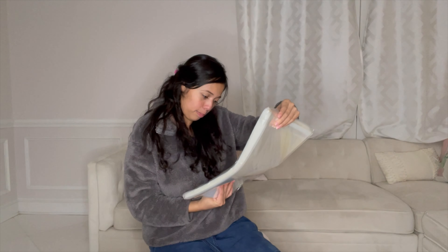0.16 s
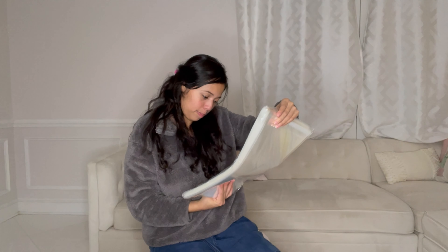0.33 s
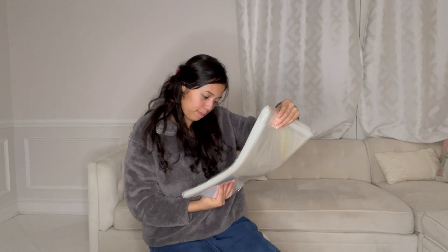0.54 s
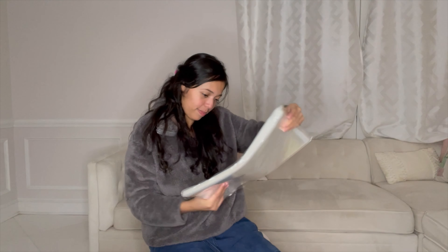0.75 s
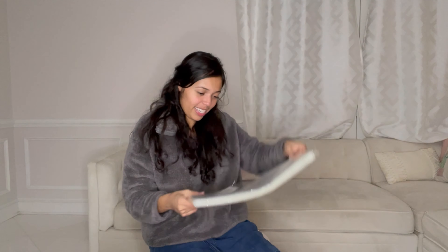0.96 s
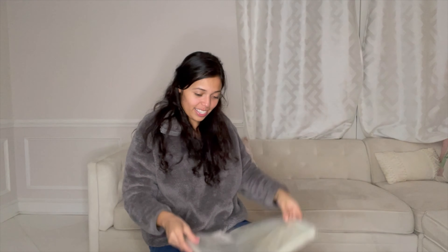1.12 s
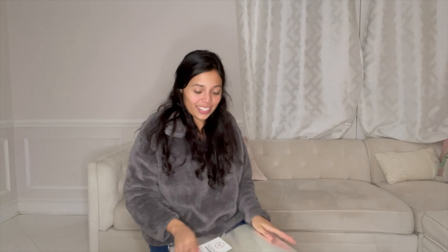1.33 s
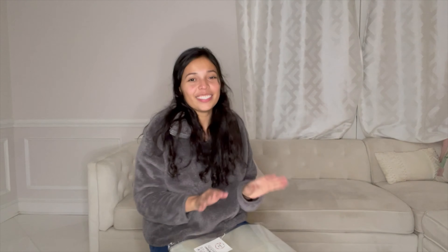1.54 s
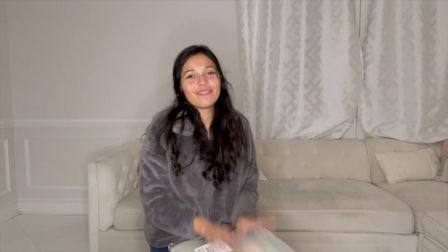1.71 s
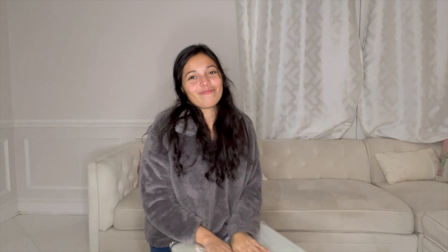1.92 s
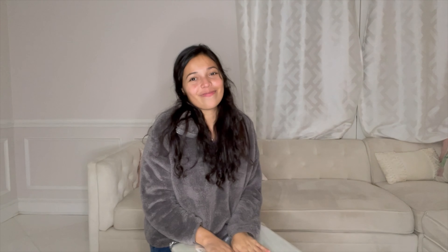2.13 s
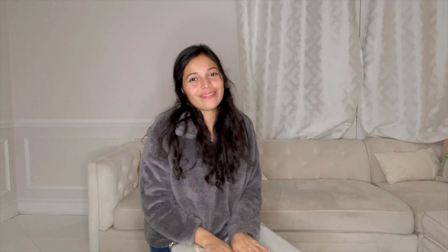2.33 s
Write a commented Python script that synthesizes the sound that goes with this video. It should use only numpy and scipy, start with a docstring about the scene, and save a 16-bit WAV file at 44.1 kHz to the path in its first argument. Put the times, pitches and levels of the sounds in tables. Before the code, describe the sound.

Stiff plastic crackles softly in the hands, growing louder until the pack thumps down. After a short lull, a sharp, popping slap lands and small ticks trail off. The microphone picks up some room echo and a faint low rumble.

```python
"""Stiff plastic crinkles and snaps as a pack of covers is flexed, dropped on a lap, then slapped with
both hands. The film buckles in dense tiny clicks and single snaps; each blow makes the soft pack thud,
and the hardest pop out air trapped between the covers. A bare-walled room reverberates over a low
rumble. Two microphone ports colour the sound, and the loudest peaks clip."""
import sys
import numpy as np
from scipy import signal
from scipy.fft import rfft, irfft, next_fast_len
from scipy.io import wavfile
from scipy.ndimage import uniform_filter1d

SR = 44100
rng = np.random.default_rng(int(sys.argv[2]) if len(sys.argv) > 2 else 0)


def file_out(sig):
    """Save sig as 16-bit WAV at sys.argv[1]."""
    # one column per channel
    cols = np.atleast_2d(sig).T
    # limit, then scale
    lim = np.clip(cols, -1, 1)
    pcm = np.round(lim * 32767).astype(np.int16)
    wavfile.write(sys.argv[1], SR, pcm)


N = 108927
T = np.arange(N) / SR
FFT_SIZE = next_fast_len(N + SR // 2)


def amp(db):
    """Amplitude ratio of a level in decibels."""
    return 10 ** (np.asarray(db) / 20)


def unit_rms(x):
    """Normalisation to unit power."""
    return x / np.sqrt(np.mean(x ** 2) + 1e-20)


def along(curve, hz):
    """Interpolation on a logarithmic frequency axis."""
    f, value = np.transpose(curve)
    return np.interp(np.log(hz + 1), np.log(f + 1), value)


def filtered(x, response):
    """Linear filtering: the spectrum is multiplied by a frequency response."""
    return irfft(rfft(x, FFT_SIZE) * response(np.fft.rfftfreq(FFT_SIZE, 1 / SR)), FFT_SIZE)[..., :N]


def coloured(x, curve):
    """Zero-phase filtering by a curve of f/Hz, level/dB."""
    return filtered(x, lambda hz: amp(along(curve, hz)))


def damped_sines(starts, hz, t60, gain, samples):
    """Superposition of free vibrations, each decaying exponentially from its start."""
    starts, hz, t60, gain = (a.reshape(-1, 1) for a in np.broadcast_arrays(starts, hz, t60, gain))
    k = np.arange(samples)
    t = k / SR
    waves = gain * amp(-60 * t / t60) * np.sin(2 * np.pi * np.clip(hz, 50, 18000) * t)
    at = np.round(starts * SR).astype(int) + k
    return np.bincount(at.ravel(), waves.ravel(), N + SR)[:N]


def noise_pair(correlation, samples):
    """Partial coherence: two noises mix into left and right short-time spectra."""
    hz, t, (common, opposed) = signal.stft(rng.standard_normal((2, samples)), SR, nperseg=512)
    angle = np.arccos(np.clip(along(correlation, hz), -1, 1))[:, None] / 2
    mid, side = np.cos(angle) * common, np.sin(angle) * opposed
    return hz, t, np.array([mid + side, mid - side])


# Background noise spectrum: f/Hz, relative density/dB
RUMBLE_SPECTRUM = [(20, -18), (35, -10), (50, 1.5), (65, 4.5), (85, -0.5), (110, 5), (135, -17.5),
                   (165, -15), (300, -15), (480, -15), (700, -28.5), (850, -36), (2200, -34), (3000, -55),
                   (5000, -50), (7700, -45), (10000, -52), (15500, -54)]
# Its left-right likeness: f/Hz, correlation
RUMBLE_CORRELATION = [(60, .9), (600, 0.29), (1500, .1)]
def rumble(level_db=-48.5):
    """Stationary noise: the room's low rumble and faint hiss, most coherent in the bass."""
    _, _, spectra = noise_pair(RUMBLE_CORRELATION, N)
    noise = signal.istft(spectra, SR, nperseg=512)[1][:, :N]
    return amp(level_db) * unit_rms(coloured(noise, RUMBLE_SPECTRUM))


# Reverberation time: f/Hz, T60/s
REVERB_TIME = [(100, 0.58), (300, 0.6), (1000, 0.52), (5000, 0.64), (9000, 0.33), (14000, 0.31)]
# Colour of the reverberant field: f/Hz, gain/dB
REVERB_GAIN = [(100, -7.5), (500, -7), (2500, -7), (6000, -9), (9000, -10.5), (14000, -20)]
# Its left-right likeness: f/Hz, correlation
REVERB_CORRELATION = [(100, 1), (500, 0.31), (2000, 0.13), (8000, 0.095)]
def room(x, echo_s=.006, echo_db=-13.5):
    """Reflection: the nearest wall echoes, then a diffuse tail decays at its own rate in each band."""
    hz, t, spectra = noise_pair(REVERB_CORRELATION, SR * 3 // 4)
    decay = amp(-60 * t / along(REVERB_TIME, hz)[:, None])
    tail = signal.istft(spectra * decay, SR, nperseg=512)[1]
    tail /= np.linalg.norm(tail[0])
    delay = round(echo_s * SR)
    echo = amp(echo_db) * np.pad(x, (delay, 0))[:N]
    diffuse = signal.fftconvolve(np.pad(x, (2 * delay, 0))[None], tail, axes=1)[:, :N]
    return coloured(diffuse, REVERB_GAIN) + echo


# Blows on the pack: t/s, level/dB, T60/s
BLOWS = [(1.06, -32, 0.091), (1.086, -12.5, 0.076), (1.092, -14, 0.03), (1.109, -12, 0.076),
         (1.129, -17, 0.051), (1.18, -32, 0.069), (1.679, -7.5, 0.1), (1.693, -13, 0.14),
         (1.701, -10.5, 0.088)]
# Their spectrum: f/Hz, relative density/dB
THUD_SPECTRUM = [(30, -41), (60, -3), (90, -2.5), (130, -7.5), (190, 3.5), (270, -0.5), (330, 0.5),
                 (420, 4), (560, -1.5), (800, -13.5), (1250, -10), (2500, -23.5)]
def thuds(attack_s=.003):
    """Heavy damping: the soft pack answers each blow with a dull, unpitched burst."""
    envelope = np.zeros(N)
    for start, db, t60 in BLOWS:
        t = np.clip(T - start, 0, None)
        envelope += amp(db - 60 * t / t60) * (1 - np.exp(-t / attack_s))
    return envelope * unit_rms(coloured(rng.standard_normal(N), THUD_SPECTRUM))


# Air escaping between the covers: t/s, f/Hz, level/dB, T60/s
AIR_POPS = [(1.091, 564, -9, 0.044), (1.098, 502, -14, 0.035), (1.68, 1265, -10, 0.034),
            (1.687, 900, -13.5, .03), (1.693, 420, -7, 0.056), (1.695, 150, -11.5, 0.087)]
def air_pops():
    """Damped resonance: trapped air leaves with short hollow pops at the hardest blows."""
    starts, hz, db, t60 = np.transpose(AIR_POPS)
    return damped_sines(starts, hz, t60, amp(db), samples=4000)


def grains(per_s=7000, median_hz=4500, log_spread=.8, cycles_per_20db=1.5):
    """Shot noise: dense random clicks, whitened to a flat spectrum of unit power."""
    count = int(per_s * N / SR)
    when, size = rng.random((count, 2)).T
    hz = median_hz * np.exp(log_spread * rng.standard_normal(count))
    gain = amp(-2.2 * np.log(1 - size))  # exponentially distributed levels: a few clicks stand out
    clicks = damped_sines(when * N / SR, hz, 3 * cycles_per_20db / hz, gain, samples=128)
    smooth_spectrum = np.sqrt(uniform_filter1d(np.abs(rfft(clicks, FFT_SIZE)) ** 2, size=2001))
    return unit_rms(filtered(clicks, lambda hz: 1 / smooth_spectrum))


# Spectrum of the slapped film: f/Hz, relative density/dB
SLAP_SPECTRUM = [(300, -17), (600, -5), (1200, -1.5), (1700, -7), (2600, 1), (4000, -7.5), (6000, -4),
                 (8000, -1.5), (9500, -3.5), (12500, -8), (15500, -13)]
def slap(start_s=1.678, attack_s=.0049, hold_s=.012, t60=.03, level_db=-3, stir_s=.018, stir_db=-29.5):
    """Impact excitation: the film stirs, then crackles in one burst as both hands land flat."""
    t = T - start_s
    rise = np.clip(t / attack_s, 0, 1) ** .5
    decay = amp(-60 * np.clip(t - attack_s - hold_s, 0, None) / t60)
    stir = amp(stir_db) * np.clip(1 + t / stir_s, 0, 1) * (t < 0)
    return (amp(level_db) * rise * decay + stir) * unit_rms(coloured(grains(), SLAP_SPECTRUM))


# How hard the film is worked: t/s, film level/dB, body level re film/dB
FLEXING = [(0, -34.5, -3), (.05, -40, -30), (.11, -51.5, 1.5), (.165, -46.5, -10.5), (.23, -69, -3),
           (.28, -60.5, -6), (0.321, -80, 16), (.36, -72, -4), (.436, -67.5, -15), (0.443, -38, -6),
           (.5, -56.5, -1), (.55, -49.5, -14), (.6, -58.5, -15), (.635, -38, -17), (0.679, -31, -6.5),
           (0.749, -25, -12.5), (.8, -27.5, -12), (.84, -33, -18), (0.886, -33, -11.5), (.93, -41, -11.5),
           (1.0, -35, -18.5), (1.05, -34.5, -1), (1.073, -20, -7.5), (1.102, -12.5, -3.5),
           (1.135, -13, -13), (1.161, -20, -19), (1.181, -16, -24), (1.221, -28, -23.5), (1.27, -25, -10.5),
           (1.31, -34, -8), (1.379, -35.5, -16), (1.42, -55, -4), (1.5, -67, -10), (1.6, -61, -17),
           (1.63, -75, -15), (1.67, -75, -12), (1.7, -47, -11), (1.75, -31.5, -9), (1.85, -34, -3),
           (1.95, -47, -1.5), (2.0, -51.5, -3), (2.07, -53.5, -12), (2.14, -59, -9.5), (2.21, -46, -12),
           (2.26, -68, -23), (2.33, -57.5, -10), (2.401, -78, -5), (2.44, -44, -17), (2.47, -65, -12)]
# Spectra of the film and of the pack's body: f/Hz, relative density/dB
FILM_SPECTRUM = [(300, -60), (700, -11.5), (1200, -3), (1800, -3.5), (2500, 1.5), (3200, -3.5),
                 (5000, -3.5), (7500, -1), (9500, -3), (12500, -7), (15500, -7.5)]
BODY_SPECTRUM = [(30, -25), (60, -5), (100, -3.5), (170, 2), (300, 0), (430, 0.5), (620, 3.5), (1000, -3.5),
                 (2000, -22)]
def crinkle():
    """Buckling: the flexed film sheds many tiny clicks, and the pack's body rumbles with it."""
    film = unit_rms(coloured(grains(), FILM_SPECTRUM))
    body = unit_rms(coloured(rng.standard_normal(N), BODY_SPECTRUM))
    times, film_db, body_db = np.transpose(FLEXING)
    return amp(np.interp(T, times, film_db)) * (film + amp(np.interp(T, times, body_db)) * body)


# Single snaps: t/s, relative level/dB, f/Hz, tick weight/dB, edge weight/dB, leftward bias/dB
FILM_SNAPS = [(0.0054, -22, 2490, -9, -21, -5), (0.0277, -23.5, 1650, -9, -25, -5),
              (0.09, -23, 3130, -20, -10, -2), (0.1064, -29, 2410, -20.5, -1, -8),
              (0.1386, -31, 4670, -38, -0.5, -3), (0.1531, -24.5, 2230, -9.5, -3, 0.5),
              (0.3815, -33.5, 5250, -29, -23, 0.5), (0.3872, -44, 2410, -24, -17, 2),
              (0.3903, -35.5, 6560, -17, -11, 0.5), (0.4403, -40, 3770, -13, -33, 1.0),
              (0.4564, -29, 4730, -6, -30, 4), (0.4893, -27.5, 2460, -20, -19, 0.0),
              (0.5088, -21.5, 3780, -26, -14, 0.0), (0.5322, -21, 3460, -46, -9.5, -7),
              (0.5831, -32, 5900, -31, -9, -10), (0.609, -24.5, 6690, -22, -9, -5),
              (0.6343, -16.5, 4170, -40, -8, -2), (0.747, -10, 2120, -18, -8, -2),
              (0.758, -19, 4870, -2, -13, -3), (0.7759, -10, 2700, -9.5, -7, -0.5),
              (0.8112, -33.5, 2400, -27, 7, 0.0), (0.9053, -15, 2700, -34, -2, -0.5),
              (0.921, -21, 5060, -23, -13, 0.5), (0.9626, -39, 2690, -33, -13, -2),
              (0.9886, -15.5, 5740, -44, 0, -1), (1.0244, -17, 7070, -27, -10, -0.5),
              (1.0387, -13, 7260, -30, -14, -3), (1.0561, -14.5, 2650, -2, -12, -2),
              (1.181, -8, 2590, 4, -15, -2.5), (1.2444, -22, 2770, -22, -2, 0.0),
              (1.264, -26, 2280, -24, -14, -0.5), (1.2849, -20, 7960, -13, -10, -2),
              (1.3003, -13.5, 2400, -0.5, 7, -1), (1.3804, -14.5, 1480, -39, -7, -2),
              (1.4425, -23, 8740, -29, 3.5, 1), (1.475, -26, 7750, -7, -5, -2),
              (1.517, -31.5, 2140, 6.5, -9, -3), (1.5286, -25, 6750, -4, -14, -6),
              (1.5484, -35, 7000, -19, -15, 1), (1.5992, -32, 7030, -34, -2, -4),
              (1.8655, -14, 2520, -1.5, -11, 7), (1.9804, -26, 2140, -18, -26, 9),
              (1.9976, -23.5, 3400, -42, -6, 2), (2.0641, -30, 2590, -25, 1, 0),
              (2.072, -30, 7150, -11, -14, -1.0), (2.0838, -33.5, 2580, 2.5, -5, 3),
              (2.1003, -25.5, 2680, -18, 1.5, -0.5), (2.1448, -49, 3450, -13, -13, 5),
              (2.1581, -19.5, 1740, -54, -9, -1.5), (2.1853, -16, 6080, -30, -8, -12),
              (2.2124, -31.5, 4980, -18, -11, -6), (2.218, -24.5, 4400, -25, -10, 0.5),
              (2.2394, -44, 2300, -35, -21, 0.0), (2.2617, -36, 3510, -26, 0, -5),
              (2.2965, -21, 8170, -46, -0.5, 4), (2.3411, -34.5, 2570, -10.5, -17, -6),
              (2.373, -29, 1830, 5, -36, -1), (2.4138, -31.5, 3300, -17, -10, -1.5),
              (2.4341, -24, 2550, -19, -2.5, -2.5)]
def snaps(rings=8, log_spread=.494, scatter_s=.0008, low_cut_hz=300):
    """Snap-through: a sudden buckle excites clusters of short rings in three frequency regions."""
    starts, db, pitch_hz, tick_db, edge_db, bias_db = np.transpose(FILM_SNAPS)[:, :, None]
    clusters = [(pitch_hz, .005, 0),  # main ring: f/Hz, T60/s, gain/dB
                (10870, .0024, edge_db + 6),  # bright edge
                (805, .012, tick_db - 3.5)]  # low tick
    draws = rng.random((len(starts), len(clusters), 2, rings))
    pan_db = np.clip(bias_db, -4, 4) / 2
    stereo = np.zeros((2, N))
    for k, (centre_hz, t60, gain_db) in enumerate(clusters):
        hz = centre_hz * np.exp(log_spread * (2 * (np.arange(rings) + draws[:, k, 0]) / rings - 1))
        onsets = starts + scatter_s * draws[:, k, 1]
        ring_db = db + gain_db - 12  # each ring carries only part of the snap
        for channel, sign in enumerate((1, -1)):
            stereo[channel] += damped_sines(onsets, hz, t60, amp(ring_db + sign * pan_db), samples=600)
    return filtered(stereo, lambda hz: (1j * hz / (low_cut_hz + 1j * hz)) ** 2)


# Direct sound's quadrature share in the left-right difference: f/Hz, gain/dB
QUADRATURE_GAIN = [(300, -11.5), (2000, -8), (5000, 3.5), (11000, -7.5)]
def scene():
    """Superposition: direct sound, widened by a phase difference, adds to reflections and rumble."""
    direct = crinkle() + slap() + thuds() + air_pops() + snaps()
    mono = direct.mean(0)
    side = filtered(mono, lambda hz: -1j * amp(along(QUADRATURE_GAIN, hz)))
    return direct + np.array([side, -side]) + room(mono) + rumble()


# Response of the ports' sum, cancelling near 11 kHz: f/Hz, gain/dB
PORT_SUM = [(9300, 0), (9700, -5), (10100, -14), (11200, -23.5), (12100, -13), (12450, -10), (12700, -0.5)]
# Response of their difference, cancelling near 7.5 kHz and at the top: f/Hz, gain/dB
PORT_DIFFERENCE = [(300, 0), (3000, 1.5), (6700, -3.5), (7200, -22), (8100, -23), (8600, 2.5), (13100, 6.5),
                   (13700, -26), (15500, -35)]
def record(dry, ceiling=.87, hardness=18, low_cut_hz=19, top_hz=15700):
    """Interference between two ports notches the treble; peaks saturate, then the band is limited."""
    mid = coloured((dry[0] + dry[1]) / 2, PORT_SUM)
    side = coloured((dry[0] - dry[1]) / 2, PORT_DIFFERENCE)
    stereo = np.array([mid + side, mid - side])
    clipped = stereo / (1 + np.abs(stereo / ceiling) ** hardness) ** (1 / hardness)
    return filtered(clipped, lambda hz: (hz < top_hz) * hz ** 2 / (hz ** 2 + low_cut_hz ** 2))


dry = scene()
out = record(dry)
file_out(out)
```